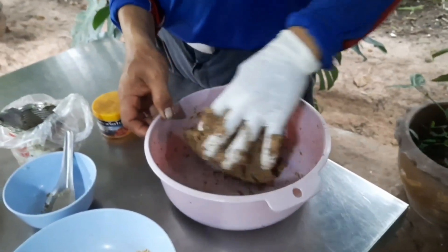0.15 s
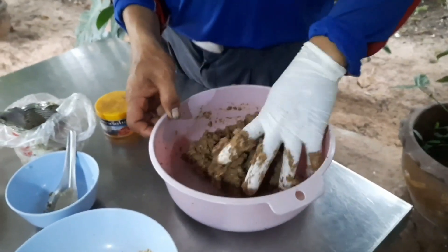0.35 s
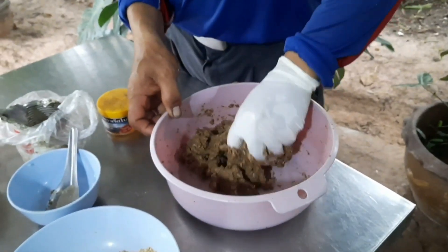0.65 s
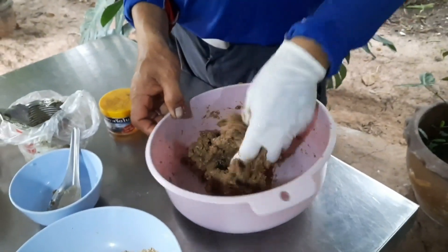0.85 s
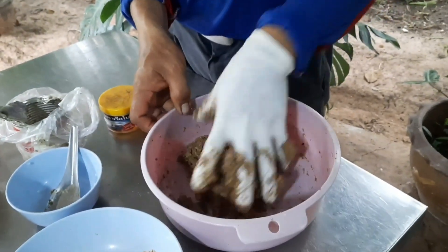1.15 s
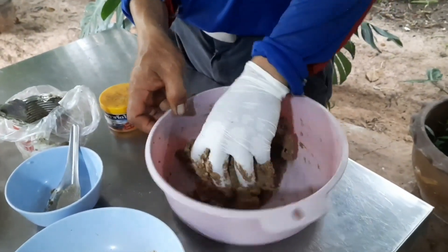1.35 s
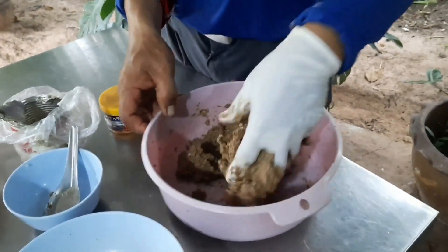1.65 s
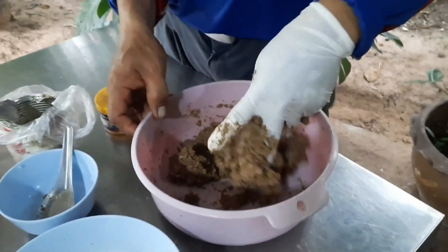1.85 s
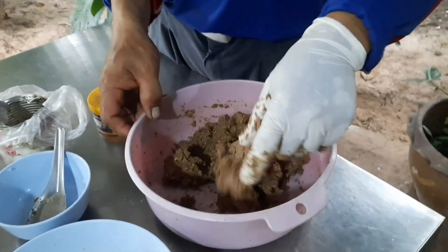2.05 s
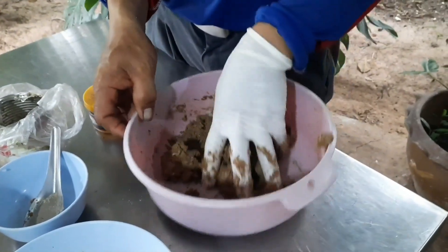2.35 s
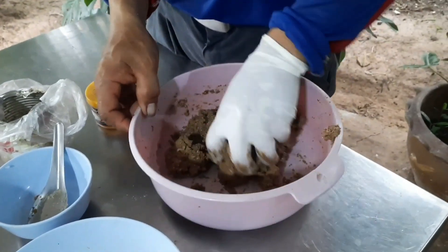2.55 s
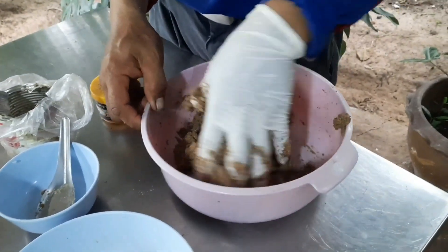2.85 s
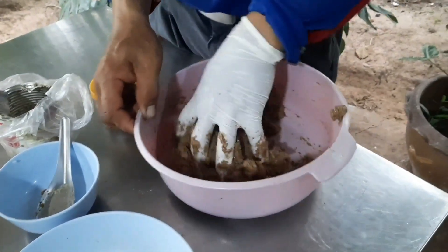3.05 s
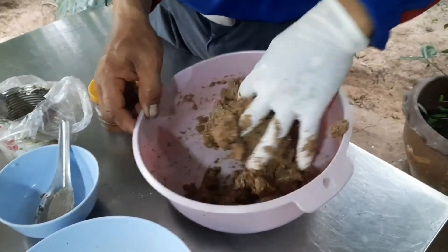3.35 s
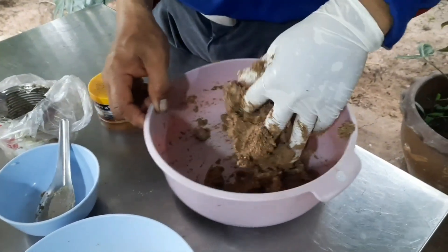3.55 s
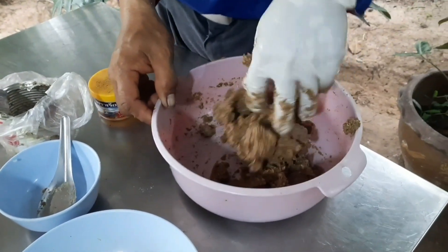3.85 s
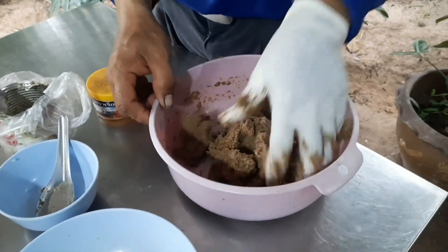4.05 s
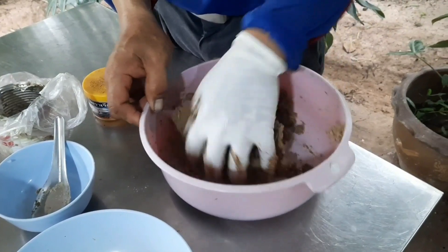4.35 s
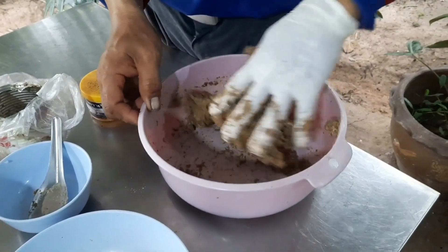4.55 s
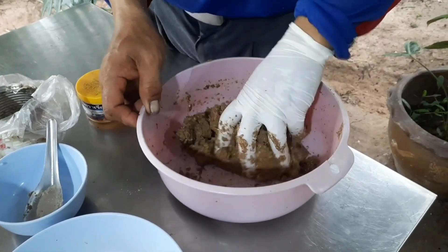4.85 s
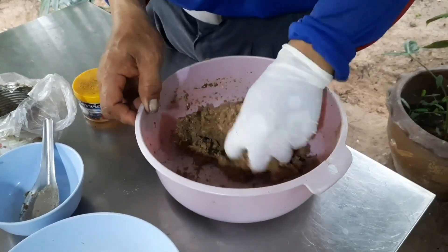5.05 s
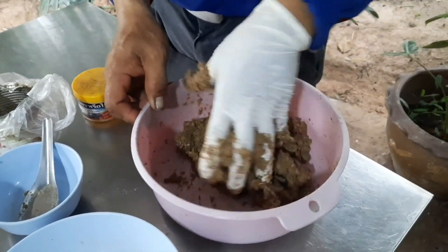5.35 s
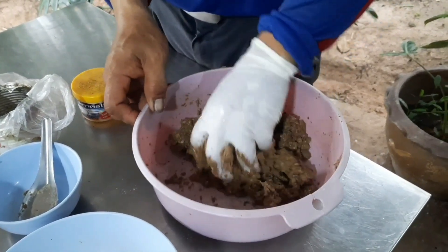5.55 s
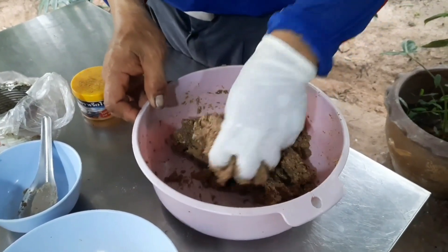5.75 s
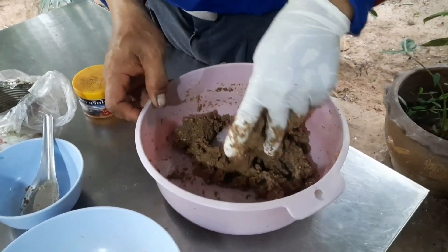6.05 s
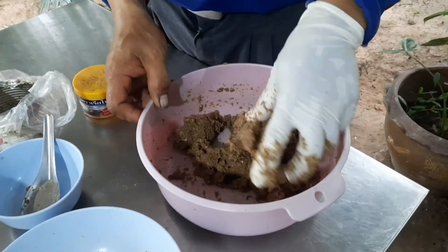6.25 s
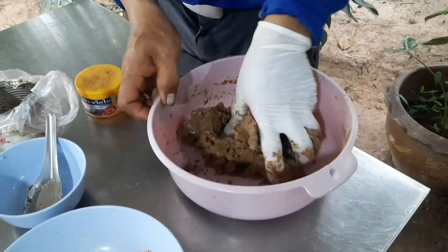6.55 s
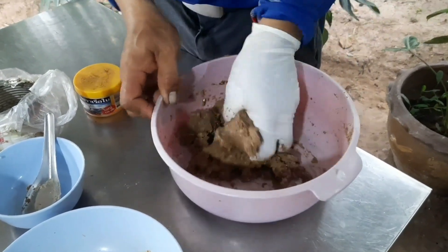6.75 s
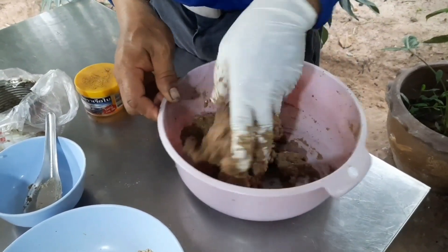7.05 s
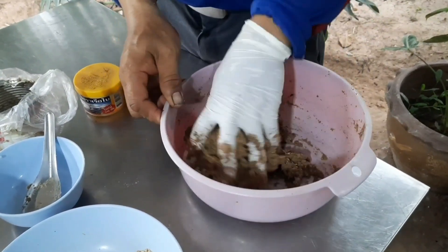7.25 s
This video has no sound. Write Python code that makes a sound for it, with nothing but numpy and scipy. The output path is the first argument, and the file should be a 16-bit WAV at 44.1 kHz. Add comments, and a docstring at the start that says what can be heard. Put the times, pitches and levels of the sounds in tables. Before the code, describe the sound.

A gloved hand kneads wet, sticky mash in a plastic bowl, with irregular squelching smears, sharp wet pops and soft thumps on the table.

```python
"""A gloved hand kneads wet, sticky mash in a plastic bowl on a steel table, close by in faint outdoor air.
From the start the glove smears the paste: noise and random snaps crackle wetly as each slide swells.
Soon thin rubbery squeaks glide by, as fuzzy narrow bands, and trapped air pops as decaying rings with a spit.
Then the first push thumps the bowl on the table, a shove into low resonances; all this recurs to the end,
while the smear drifts from the left to right of centre."""
import sys
import numpy as np
from scipy import signal
from scipy.fft import rfft, irfft, next_fast_len
from scipy.io import wavfile
from scipy.ndimage import uniform_filter1d, map_coordinates

SR = 44100
rng = np.random.default_rng(int(sys.argv[2]) if len(sys.argv) > 2 else 0)


def unload_audio(sound):
    """Save the sound as a 16-bit wav file, at the path given as the first command line argument."""
    columns = np.transpose(np.atleast_2d(sound))
    # keep every value between -1 and 1, then stretch to whole-number steps
    steps = np.round(np.clip(columns, -1, 1) * 32767)
    wavfile.write(sys.argv[1], SR, steps.astype(np.int16))


N = 326781  # samples


def amp(db):
    """Decibels to gain."""
    return 10 ** (np.asarray(db) / 20)


def decibels(power):
    """Power to decibels."""
    return 10 * np.log10(power + 1e-20)


def unit(x):
    """Scale to rms 1."""
    return x / np.sqrt(np.mean(x ** 2) + 1e-20)


def along(points, hz):
    """Read (frequency [Hz], value) points on a log frequency axis."""
    f, v = np.transpose(points)
    return np.interp(np.log(hz + 1), np.log(f + 1), v)


def wobble(rate):
    """A smooth random curve with rate knots a second."""
    coarse = np.arange(0, N, 20)
    knots = rng.standard_normal(int(N * rate / SR) + 4)
    values = map_coordinates(knots, [coarse * rate / SR])
    return np.interp(np.arange(N), coarse, values)


def filtered(x, response):
    """Multiply the spectrum of x by a complex response of frequency."""
    size = next_fast_len(N + SR // 2)
    return irfft(rfft(x, size) * response(np.fft.rfftfreq(size, 1 / SR)), size)[..., :N]


def add(track, s, sound):
    """Mix a sound into a track at time s."""
    part = track[..., max(round(s * SR), 0):][..., :sound.shape[-1]]
    part += sound[..., :part.shape[-1]]


def panned(x, left_db):
    """Lean a sound to the left by left_db."""
    return x * np.array([amp(left_db / 2), amp(-left_db / 2)]).reshape(2, -1)


# stereo width of the noise layers: (frequency [Hz], left-right likeness [0 to 1])
LIKENESS = [(100, 0.81), (300, 0.97), (1200, 0.4), (3000, 0.25), (6000, .08), (14000, 0.063)]


def spread(pair, spectrum):
    """Colour two unrelated signals and blend them to stereo of rms 1, near mono in the bass."""
    def mid_side(hz):
        turn = np.arccos(np.clip(along(LIKENESS, hz), -1, 1)) / 2
        return amp(along(spectrum, hz)) * [np.cos(turn), np.sin(turn)]
    mid, side = filtered(pair, mid_side)
    return unit(np.array([mid + side, mid - side]))


def crackle(rate, scatter_db, hiss_db):
    """Tiny wet films snapping, on average rate a second, over the hiss of countless smaller ones."""
    sizes = amp(scatter_db * np.clip(rng.standard_normal(N), -2, 2))
    snaps = (rng.random(N) < rate / SR) * sizes
    return unit(snaps * rng.standard_normal((2, N))) + amp(hiss_db) * rng.standard_normal((2, N))


def resonances(modes, f):
    """Complex response of (frequency [Hz], width [Hz], level [dB]) modes of alternating sign."""
    return sum((-1) ** k * amp(db) * 1j * f * w / (hz * hz - f * f + 1j * f * w)
               for k, (hz, w, db) in enumerate(modes))


PEAK_SHARE = 0.44  # part of a movement spent gathering speed


def swell(start, length):
    """Speed of one movement of the hand, rising from 0 to 1 and back."""
    progress = np.clip((np.arange(N) / SR - start) / length, 0, 1)
    return np.sin(np.pi * np.interp(progress, [0, PEAK_SHARE, 1], [0, .5, 1]))


# colour of the outdoor air: (frequency [Hz], relative level [dB per Hz])
AIR_COLOUR = [(20, -35), (50, -1.5), (100, 5), (200, -9.5), (500, -16), (1100, -26), (3000, -24.5),
              (16000, -36.5)]


def outdoor_air():
    """Steady noise with its weight in the bass, for the faint air outdoors."""
    return amp(-71.0) * spread(rng.standard_normal((2, N)), AIR_COLOUR)


# bowl walls and shelter: (frequency [Hz], time to fall 60 dB [s])
SHELTER_DECAY = [(150, .25), (1200, 0.17), (14000, 0.11)]


def shelter(x):
    """A short scattered answer from the surroundings: decaying noise, different at each ear."""
    hz, t, z = signal.stft(rng.standard_normal((2, SR // 3)), SR, nperseg=256)
    decay = amp(-60 * t / along(SHELTER_DECAY, hz)[:, None])
    tail = signal.istft(z * decay, SR, nperseg=256)[1]
    tail = tail / np.linalg.norm(tail[0])
    tail = np.pad(tail, ((0, 0), (SR // 400, 0)))  # the answer waits 2.5 ms
    return signal.fftconvolve(x, tail, axes=1)[:, :N]


# the hand leaning slowly on the bowl: (start [s], length [s], relative level [dB])
LEANING = [(0.817, .1, -55.5), (1.76, 0.17, -57), (2.755, 0.17, -59.5), (3.29, 0.14, -49),
           (5.44, 0.28, -47)]
ROCK_ATTACK_S, ROCK_FADE_DB_PER_S = 0.0087, 122
REST_DB, REST_WANDER_DB = -73.5, 2  # the other hand steadying the rim


def weight():
    """Force working the bowl against the table: it fades after each push and swells with each lean."""
    power = amp(REST_DB + REST_WANDER_DB * wobble(9.3)) ** 2
    t = np.arange(SR // 2) / SR
    onset = 1 - np.exp(-t / ROCK_ATTACK_S)
    for s, _, rock_db in PALM_PUSHES:
        add(power, s, (amp(rock_db - ROCK_FADE_DB_PER_S * t) * onset) ** 2)
    for start, length, db in LEANING:
        power += (amp(db) * swell(start, length)) ** 2
    return np.sqrt(power)


# the palm pushing on the lump: (time [s], relative push level [dB], relative level of the rocking after [dB])
PALM_PUSHES = [(0.344, -55, -75), (0.957, -46, -45.5), (1.635, -33, -39), (2.274, -41, -51),
               (2.92, -48, -46.5), (3.072, -48, -49), (3.436, -33.5, -35.5), (4.082, -41, -50),
               (5.247, -30, -34.5), (5.381, -40.5, -42), (7.031, -32, -36), (7.135, -39, -64)]
# low modes of bowl and table top: (frequency [Hz], width [Hz], mean level [dB])
BOWL_MODES = [(81, 16, -5.5), (118, 19.5, -3.5), (155.4, 16.2, -0.5), (170.8, 19.8, -2.5), (308.7, 30, -5),
              (372, 43, -7), (437, 130, -12.5), (704, 450, -16)]


def bowl():
    """Pushes and the shifting weight of the hand drive the low modes of bowl and table."""
    blows = np.zeros(N)
    t = np.arange(SR // 4) / SR
    for s, db, _ in PALM_PUSHES:
        # one shove, then the lump gives way in small jerks
        shove = np.exp(-t / 0.0013)
        giving_way = 0.084 * amp(-60 * t / 0.32) * rng.standard_normal(len(t))
        add(blows, s, amp(db + 20.5) * (shove + giving_way))
    forces = np.array([blows, crackle(rate=300, scatter_db=2.0, hiss_db=-5.5)[0]])
    forces = filtered(forces, lambda f: 1 / (1 + 1j * f / 600) ** 2)  # the mash cushions every contact
    ringing = np.zeros((2, N))
    for k, (hz, width, db) in enumerate(BOWL_MODES):
        # as the lump moves round the bowl it favours now one mode, now another
        favour = (-1) ** k * amp(db + 2.6 * wobble(9))
        ringing += favour * signal.lfilter(*signal.iirpeak(hz, hz / width, SR), forces)
    thuds, jerks = ringing
    return thuds + amp(-1.5) * weight() * unit(jerks)


# thin rubbery squeaks of the glove:
# (start [s], length [s], start frequency [Hz], end frequency [Hz], level [dB])
GLOVE_SQUEAKS = [(0.158, 0.13, 2600, 2910, -56), (0.363, 0.096, 2420, 3310, -61),
                 (1.99, 0.097, 2380, 2490, -63.5), (4.723, 0.33, 3110, 2340, -65),
                 (5.126, 0.083, 1390, 1577, -68), (6.771, 0.093, 2183, 1980, -51.5)]


def squeaks():
    """Rubber creeping slowly over the paste sings in a fuzzy, gliding band."""
    out = np.zeros((2, N))
    lowpass = signal.butter(2, 270, fs=SR, output="sos")  # half the width of the band [Hz]
    for s, length, start_hz, end_hz, db in GLOVE_SQUEAKS:
        size = int(length * SR)
        phase = 2 * np.pi * np.cumsum(np.linspace(start_hz, end_hz, size)) / SR
        fuzz = signal.sosfilt(lowpass, rng.standard_normal((2, 2, size)))
        band = fuzz[0] * np.cos(phase) + fuzz[1] * np.sin(phase)
        stereo = unit(band + 0.18 * band[::-1])  # a little of each side leaks into the other
        add(out, s, amp(db) * signal.windows.tukey(size) * stereo)
    return out


# air pockets bursting:
# (time [s], relative level [dB], nominal cavity frequency [Hz], spit over the ring, relative [dB])
AIR_POCKETS = [(0.2627, -36, 2120, -16.5), (0.844, -34, 1360, -17), (0.9516, -25.5, 2190, -4),
               (1.131, -39.5, 1180, -12.5), (1.332, -29, 1310, -12.5), (1.39, -36, 1110, -17.5),
               (1.6259, -17, 2720, -6), (1.6282, -18.5, 1710, -5), (1.6789, -24.5, 980, -9),
               (1.6994, -23.5, 1256, -10), (2.268, -28, 2180, -2.5), (2.9174, -22, 1370, -15.5),
               (3.0668, -15, 1670, -12), (3.3797, -38, 1640, -4.5), (3.4305, -25.5, 2345, 2),
               (4.0813, -36, 1750, -16.5), (4.5737, -29.5, 1590, -10.5), (5.2086, -33, 2380, -13),
               (5.2385, -16.5, 2450, -4), (5.376, -25.5, 685, -15.5), (6.6323, -43, 3600, -2.5),
               (6.8738, -37.5, 2990, -1), (6.9111, -39.5, 1590, -12.5), (7.0201, -17.5, 3280, -8.5),
               (7.1331, -26.5, 1505, -6.5), (7.245, -48, 1880, -5.5)]
# colour of the spit: (frequency [Hz], relative level [dB])
SPIT_COLOUR = [(300, -12.5), (1200, -7), (2100, -10), (3700, -6.5), (6000, -9), (9000, -16), (16000, -27)]
# the plastic wall of the bowl: (frequency [Hz], width [Hz], relative level [dB])
WALL_MODES = [(1336, 25, -8.5), (1495, 18, -9), (1943, 60, -6)]


def pops():
    """Each air pocket rings briefly in its soft cavity and spits as the seal tears."""
    rings, spits = np.zeros(N), np.zeros((2, N))
    t = np.arange(SR // 10) / SR
    opening = 1 - np.exp(-(t / 0.00058) ** 3)  # the seal peels open in about a millisecond
    for s, db, hz, spit_db in AIR_POCKETS:
        t60 = 0.011 * (hz / 1500) ** -.3  # bigger pockets ring longer
        ring = np.zeros(len(t))
        # the cavity is irregular: a weaker resonance lies on each side of the main one
        for ratio, level_db in [(.7, -6.5), (1, -4), (1.35, -7.5)]:
            mode_hz = hz * ratio * (1 + 0.049 * rng.standard_normal())
            ring += amp(level_db) * np.sin(2 * np.pi * mode_hz * t)
        add(rings, s, amp(db + 7.0 - 60 * t / t60) * opening * ring)
        tear = amp(-60 * t / 0.015) * opening * rng.standard_normal((2, len(t)))
        add(spits, s, amp(db + spit_db + 14.0) * tear)
    spits = filtered(spits + .6 * spits[::-1], lambda hz: amp(along(SPIT_COLOUR, hz)))
    # the bowl wall rings along; the palm lands right of centre, so the left ear hears it later
    lag_s = np.array([[.00005], [0]])
    return filtered(rings + spits,
                    lambda f: (1 + 2 * resonances(WALL_MODES, f)) * np.exp(-2j * np.pi * f * lag_s))


def mottled(x, depth_db):
    """Voids open and close in the paste, so patches of the spectrum swell and fade."""
    z = signal.stft(x, nperseg=256)[2]
    field = uniform_filter1d(rng.standard_normal(z.shape[1:]), size=4, axis=0)  # blur in frequency
    field = uniform_filter1d(field, size=9, axis=1)  # blur in time
    return unit(signal.istft(z * amp(depth_db * unit(field)), nperseg=256)[1][:, :N])


# the hand closed on the lump, which creeps quietly between the slides:
# (start [s], end [s], mean smear level [dB], mean fizz level, relative [dB])
HAND_GRIPS = [(-.1, 0.35, -64, -63.5), (.43, 1.128, -61.5, -62.5), (1.145, 1.862, -58.5, -61.5),
              (2.32, 2.67, -60.5, -59), (2.69, 3.66, -61, -58.5), (4.075, 4.72, -65, -64.5),
              (4.764, 5.872, -64, -58), (5.926, 6.116, -65, -62.5), (6.28, 6.93, -60.5, -58.5),
              (7.17, 7.5, -61.5, -60.5)]
GRIP_ATTACK_S, GRIP_RELEASE_S = 0.073, 0.033
FIZZ_RELEASE_S = 0.066  # the wet skin fizzes on after the creep stops
CREEP_SQUELCH_DB, CREEP_WANDER_DB = -7.5, 3.5  # squelch relative to smear; depth of wander
SETTLE_DB = -77.5  # the mash fizzes faintly even when let go
# the glove sliding through the paste:
# (start [s], length [s], smear level [dB], squelch over smear, relative [dB], fizz over smear, relative [dB])
GLOVE_SLIDES = [(-.06, 0.15, -49, -8.5, -5), (0.22, 0.11, -51.5, -6.5, -10.5),
                (0.362, 0.14, -62.5, -21, -9.5), (0.558, .17, -60.5, -25, -6.5),
                (.725, 0.062, -51.5, -10, -5.5), (0.812, 0.11, -51.5, -3, -0.5),
                (0.923, .08, -45, -7, -6.5), (0.984, 0.14, -44.5, -10.5, -16), (1.232, .1, -47.5, -6.5, -7),
                (1.265, 0.19, -34, -12, -2.5), (1.497, 0.11, -44.5, -13.5, -1.5),
                (1.59, 0.16, -40.5, -13, -1), (1.814, 0.075, -47.5, -13, -2),
                (2.108, 0.14, -55.5, -6.5, -8), (2.256, 0.14, -38, -14.5, 2.5),
                (2.339, 0.041, -36, -16, -12.5), (2.733, 0.17, -42, -13.5, -6),
                (2.836, 0.077, -41.5, -12, -7.5), (2.93, 0.14, -45, -9, -8),
                (3.15, 0.12, -52.5, -9.5, -11.5), (3.287, 0.076, -59, 2, 7.5),
                (3.412, 0.17, -42, -8.5, -5.5), (3.481, 0.2, -42.5, -13, -5),
                (4.047, 0.11, -54.5, -2, -5.5), (4.095, 0.15, -40.5, -10, -2.5),
                (4.23, 0.2, -43, -11.5, -1.5), (4.535, 0.11, -51.5, -7, -11.5),
                (4.595, 0.12, -45, -11.5, -5), (5.074, 0.045, -51.5, -22, -8.5),
                (5.177, 0.064, -48, -12.5, -8), (5.218, 0.17, -39, -7, -2), (5.405, 0.08, -43.5, -8, -5.5),
                (5.525, 0.088, -51, 1.5, -4), (5.703, .12, -50, -6, -3.5), (5.987, 0.081, -39.5, -17.5, -6),
                (6.064, 0.095, -52, -8, -8.5), (6.284, 0.062, -48, -8.5, -4),
                (6.411, 0.17, -35.5, -13.5, -0.5), (6.661, 0.17, -44.5, -13.5, -4.5),
                (6.851, 0.057, -52, -3.5, -1), (6.994, 0.15, -39.5, -13.5, -4),
                (7.105, 0.061, -50, -0.5, -6), (7.365, 0.067, -57.5, -10, 1)]
# each layer grows as its own power of the sliding speed
SQUELCH_POWER, SMEAR_POWER, FIZZ_POWER = 0.8, 0.94, 1.37


def kneading_levels():
    """Squelch, smear and fizz in dB: the slides on top of the slow creep under each grip."""
    t = np.arange(N) / SR
    power = np.zeros((3, N))
    release = np.array([[GRIP_RELEASE_S], [GRIP_RELEASE_S], [FIZZ_RELEASE_S]])
    for start, end, smear_db, fizz_db in HAND_GRIPS:
        closing = np.clip((t - start) / GRIP_ATTACK_S, 0, 1)
        letting_go = np.exp(-np.clip((t - end) / release, 0, 20))
        levels = amp([[smear_db + CREEP_SQUELCH_DB], [smear_db], [fizz_db]])
        power += (levels * closing * letting_go) ** 2
    power *= amp(CREEP_WANDER_DB * wobble(13)) ** 2
    power[-1] += amp(SETTLE_DB) ** 2
    growth = np.array([[SQUELCH_POWER], [SMEAR_POWER], [FIZZ_POWER]])
    for start, length, db, squelch_db, fizz_db in GLOVE_SLIDES:
        levels = amp([[db + squelch_db], [db], [db + fizz_db]])
        power += (levels * swell(start, length) ** growth) ** 2
    return decibels(power)


# colours of the paste layers, each: (frequency [Hz], relative level [dB per Hz])
SQUELCH_COLOUR = [(200, -23.5), (420, -12.5), (700, -4.5), (1050, 3.5), (1450, -4.5), (1900, -1.5),
                  (3000, -44.5)]
SMEAR_COLOUR = [(900, -30.5), (1400, -7.5), (1800, -3), (2350, -1.5), (2900, 1.5), (3800, -2.5),
                (4700, -7.5), (7000, -39.5)]
SHEEN_COLOUR = [(2500, -38.5), (4000, -4.5), (5000, -4), (6300, -4), (7500, -11.5), (10000, -18)]
FIZZ_COLOUR = [(4000, -23.5), (6500, 0.5), (8500, 5.5), (10000, 0.5), (11300, 3.5), (13000, 5.5),
               (16000, -1.5)]
# where the hand works: (time [s], left over right [dB])
HAND_PLACE = [(0.0, 5), (1.05, 4), (1.7, 0.5), (2.3, -1.1), (3.55, -2), (4.2, -3), (5.3, -1.3),
              (6.05, -4.5), (6.5, -3), (7.41, -1.5)]


def paste():
    """The glove sticks and slips: big voids squelch, small ones crackle, the wet skin fizzes."""
    squelch_db, smear_db, fizz_db = kneading_levels()
    slip = wobble(130)
    squelch = mottled(spread(crackle(rate=600, scatter_db=1, hiss_db=6.5), SQUELCH_COLOUR), depth_db=4)
    smear = mottled(spread(crackle(rate=1800, scatter_db=2, hiss_db=5.5), SMEAR_COLOUR), depth_db=2.5)
    sheen = mottled(spread(crackle(rate=3000, scatter_db=2.5, hiss_db=4.5), SHEEN_COLOUR), depth_db=-1.0)
    fizz = mottled(spread(crackle(rate=4000, scatter_db=9.0, hiss_db=3.5), FIZZ_COLOUR), depth_db=2.5)
    # the smear turns bright only where the wet skin fizzes too, and more so in a hard stroke
    sheen_db = 0.48 * smear_db + 0.73 * fizz_db + 8.5
    rub = amp(smear_db + 0.66 * slip) * smear + amp(sheen_db + 1.3 * slip) * sheen
    place_s, left_db = np.transpose(HAND_PLACE)
    rub = panned(rub, np.interp(np.arange(N) / SR, place_s, left_db))
    film = amp(fizz_db - 1.0 + 0.92 * wobble(50)) * fizz
    glove = amp(squelch_db - 1.0 + 1.6 * slip) * squelch + rub + film
    lag_s = np.array([[0], [.00005]])  # the glove's sound reaches the left port first
    return filtered(glove, lambda f: np.exp(-2j * np.pi * f * lag_s))


def scene():
    """Paste, squeaks, pops and bowl, with their short echo, over faint outdoor air."""
    bursts = pops()
    kneading = paste() + squeaks() + bowl()
    echo = shelter(amp(-9.5) * bursts + amp(-11.5) * kneading)
    return bursts + kneading + echo + outdoor_air()


# the two microphone ports favour different bands: (frequency [Hz], left over right [dB])
PORT_BALANCE = [(600, 4.5), (1100, 3.5), (1800, 1), (4500, -5.5), (7000, 0)]
TOP_HZ = 15950  # band limit


def record(dry):
    """Each port colours the sound its own way; nothing is kept above the band limit."""
    return filtered(dry, lambda hz: panned(1.0, along(PORT_BALANCE, hz)) * (hz < TOP_HZ))


dry = scene()
out = record(dry)
unload_audio(out)
```